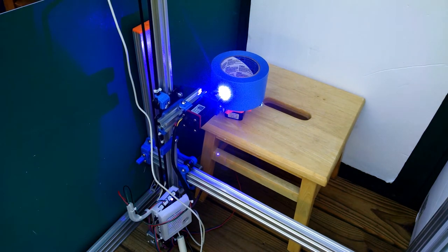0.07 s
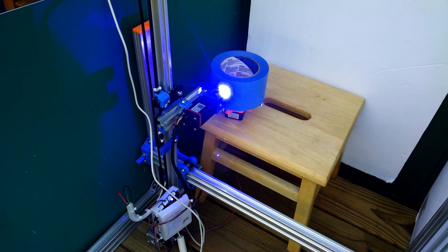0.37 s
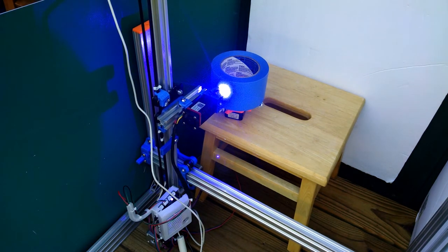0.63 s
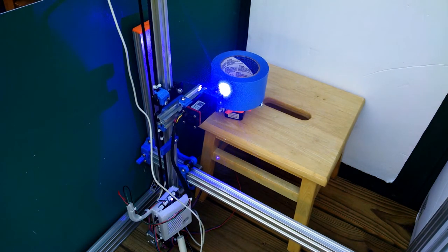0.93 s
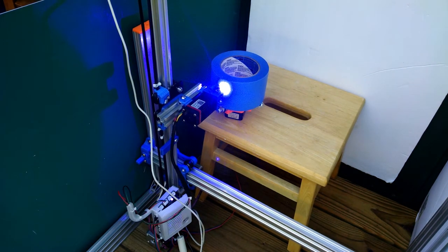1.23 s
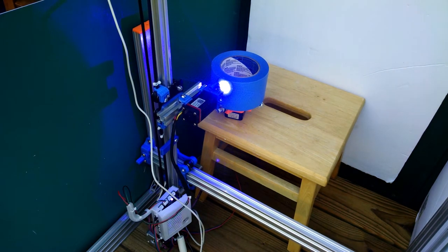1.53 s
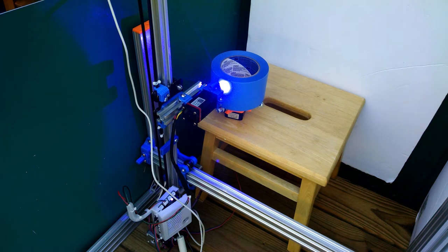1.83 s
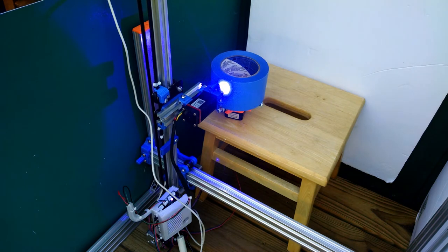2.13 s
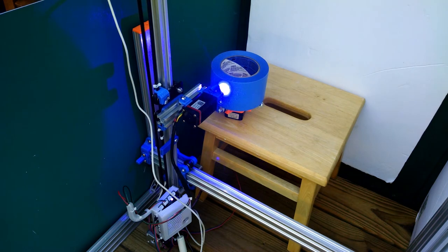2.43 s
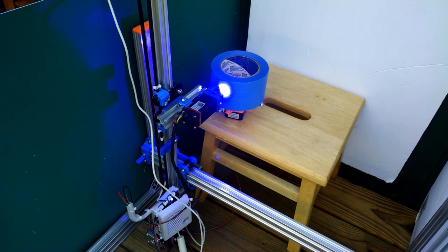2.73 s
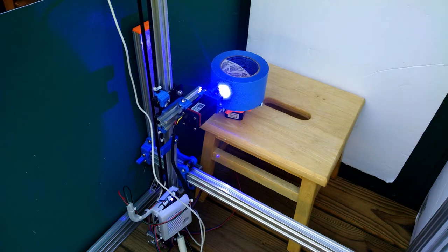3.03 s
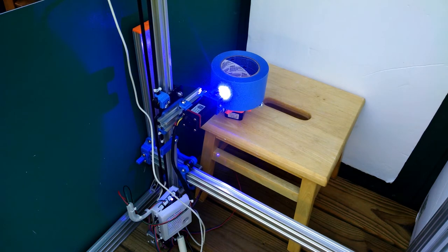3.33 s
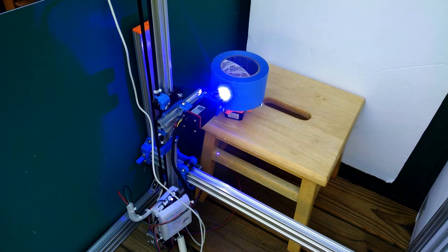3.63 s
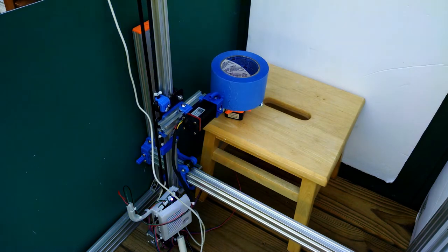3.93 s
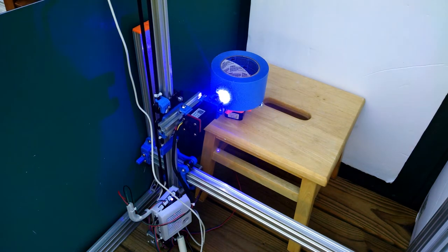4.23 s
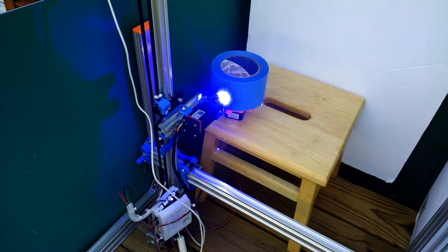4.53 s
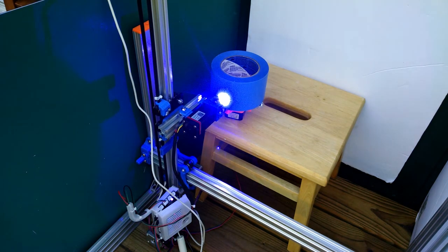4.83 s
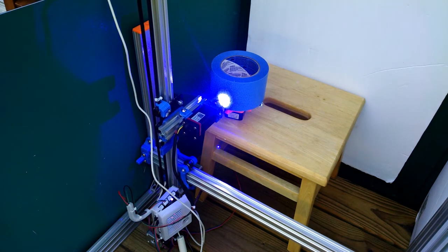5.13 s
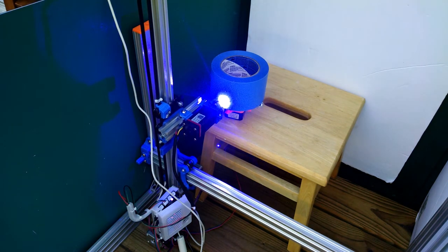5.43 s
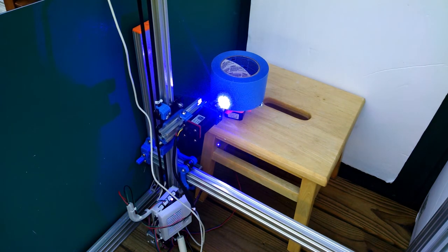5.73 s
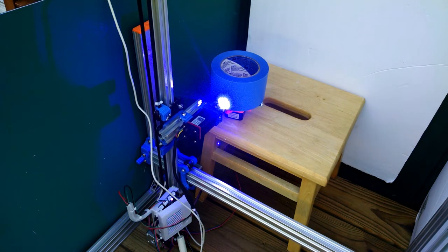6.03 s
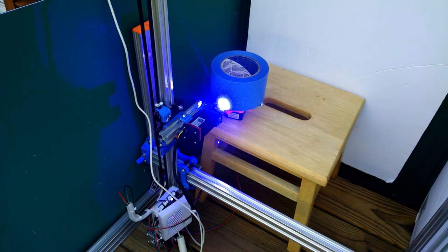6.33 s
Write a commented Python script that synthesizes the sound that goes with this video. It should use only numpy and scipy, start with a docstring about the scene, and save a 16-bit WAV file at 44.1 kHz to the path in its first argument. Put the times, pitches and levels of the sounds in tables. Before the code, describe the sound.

The steady blowing of a cooling fan and the thin, warbling whine of stepper motors come from an engraving machine, heard close up in stereo in a small workshop. Underneath are a faint hum, a low rumble and occasional dull thuds. A sharp hiss cuts in after about two and a half seconds and quickly fades. The rubbing along the rail then eases off while the fan and motors carry on.

```python
"""A cooling fan blows and drones over mains hum: a home-built laser engraver is at work in a small
workshop, close to a pair of microphones. Its stepper coils whistle in quick sweeps, the motors whirr,
the carriage sings and the gantry rumbles and jolts. One axis rubs along its rail, speeds up and slows
again. About 2.6 seconds in, one short hiss bursts out, scatters from the walls and dies away."""
import sys
import numpy as np
from scipy import signal
from scipy.fft import rfft, irfft
from scipy.io import wavfile

SR = 44100
rng = np.random.default_rng(int(sys.argv[2]) if len(sys.argv) > 2 else 0)


def transcribe(u):
    """Save the signal u as a 16-bit wav file named by the first command-line argument.

    u: samples, shape (n,) or (channels, n), limited to [-1, 1]; the rate is SR.
    q: integer samples, one column per channel.
    """
    v = np.clip(np.atleast_2d(u).T, -1, 1)
    q = np.round(v * 32767).astype(np.int16)
    wavfile.write(sys.argv[1], SR, q)


N = 286209
T = np.arange(N) / SR
HZ = np.fft.rfftfreq(N, 1 / SR)
THROB_HZ, PULLEY_HZ, SWAY_HZ, CHIRP_HZ = 43.92, 13.29, 4.855, 4.778  # sweep rates of the coil whistles

# How alike the two microphones hear noise. Each row: frequency in Hz, likeness from 0 to 1.
MIC_LIKENESS = [(25, .94), (70, .85), (160, .6), (400, .52), (800, .72), (1200, .92), (2500, .96),
                (3700, .84), (5000, .84), (6500, .68), (7700, .75), (10000, .87), (15000, .8)]
# Standing waves of the workshop. Each row: frequency in Hz, lead of the left microphone in radians.
ROOM_LEAD = [(20, 0.28), (60, 0.74), (135, 1), (190, 0.68), (270, 0), (360, 0.68), (500, 0.91), (1200, 0)]
# The fan's shaft. Each row: time in seconds, turns per second.
ROTOR_SPEED = [(0, 79), (1.4, 80), (2, 81.7), (3.3, 83.8), (4.1, 84.4), (5.2, 84.15), (6.49, 83.1)]
# The fan's drone. Each row: time in seconds, level in dB, left minus right in dB.
ROTOR_DRONE = [(0, -42, -9), (.2, -38.5, -2), (.42, -50.5, -12), (.75, -34.5, -3), (1, -43.5, -1),
               (1.6, -48, -8), (1.9, -35, -5.5), (2.3, -39, -7), (2.8, -36.5, -6), (3.3, -37.5, 1),
               (3.9, -33, -2), (4.3, -36.5, 0), (4.5, -42.5, 3), (4.75, -39.5, -1.5), (5.05, -44.5, -5),
               (6, -47, -11), (6.49, -56, -5)]

# Noise spectra. Each row: frequency in Hz, relative spectral level in dB.
AIR_SPECTRUM = [(130, 3.5), (250, -2.5), (330, 0), (400, -2.5), (600, -1.5), (980, -3.5), (1420, -8),
                (2150, -5.5), (2700, -12), (3800, -5), (6000, -18), (7900, -6.5), (8900, -22), (14500, -18)]  # rush of the fan
RUMBLE_SPECTRUM = [(10, -20), (20, 1), (38, 11), (57, 6.5), (75, 10), (115, -5.5), (170, -13.5), (280, -46),
                   (600, -30)]  # frame and floor
THUD_SPECTRUM = [(12, -14), (24, -2), (40, 15), (56, 5), (78, 8), (115, -13), (280, -33)]  # a jolt through the floor
SHUDDER_SPECTRUM = [(60, -25), (115, 6.5), (160, 1), (220, 5), (300, -0.5), (420, -14), (900, -2),
                    (1600, -29)]  # gantry frame
RUB_SPECTRUM = [(1500, -13), (2600, -7.5), (3300, -4), (4300, -6), (5300, -3), (6200, 0.5), (7900, -10),
                (8900, -16), (11500, -17.5), (14500, -23)]  # wheels and belt along the rail
HISS_SPECTRUM = [(1400, -7), (2000, -14), (2800, 4), (3800, 7), (5200, 4.5), (6300, 4.5), (7200, 8),
                 (9000, 4.5), (12000, 4), (13300, 3.5), (14500, -1), (15300, 5)]  # the short burst

# Resonances. Each row: centre in Hz, width in Hz, relative level in dB.
FAN_HOUSING_RESONANCES = [(325, 23, 0), (440, 36, 1), (496, 22, -4.5), (755, 29, -2), (1012, 50, -4.5),
                          (1180, 28, -4.5)]
STEPPER_CASING_RESONANCES = [(6680, 290, -11), (7220, 180, 0.5), (7570, 120, -2), (11340, 140, -17.5),
                             (13300, 420, -17.5)]
CARRIAGE_RESONANCES = [(5230, 36, 2), (5520, 48, -3), (6540, 80, 7), (6760, 120, -0.5), (6760, 140, 5),
                       (7300, 320, 10)]
RAIL_RESONANCES = [(2486, 20, -10.5), (3770, 37, 3), (3980, 30, -0.5), (4950, 98, -0.5)]

# Jolts of the gantry. Each row: middle and length in seconds, thud and shudder levels in dB.
GANTRY_JOLTS = [(0.267, .3, -50, -55), (.66, 0.26, -40, -56), (0.933, 0.18, -58, -40),
                (2.64, 0.18, -36.5, -38.5), (2.885, 0.29, -36.5, -60), (3.6, 1.8, -43, -54),
                (5.416, 0.16, -39.5, -64), (5.803, 0.27, -36, -44), (6.124, 0.3, -40, -62)]
# Mains hum. Each row: frequency in Hz, relative level in dB, left minus right in dB, left lead in radians.
MAINS_PARTIALS = [(99.8, 0, -4.5, 2), (149.8, -13, 3, 1)]
# Swells of the hum. Each row: middle and length in seconds, level of the added hum in dB.
MAINS_SWELLS = [(.1, 0.83, -47), (1.5, 0.97, -40), (6, 0.68, -46.5)]
# Thin tones of the motors. Each row: frequency in Hz, level in dB, left minus right in dB.
MOTOR_TONES = [(238.1, -57.5, 11.5), (1185, -64, 1), (12768, -70, 14)]
# Coil whistles. Each row: top pitch, dip and jitter in Hz, sweeps per second, first crest in seconds,
# crest sharpness, starting level in dB, growth in dB per second, fade in the dip in dB,
# relative level of the octave in dB, left minus right in dB.
COIL_WHISTLES = [(7530, 90, 16, THROB_HZ, 0.0024, 1, -47.5, 0.41, 10, -14, 7.5),
                 (7260, 170, 59.3, THROB_HZ, .001, 1, -51, 0, 5, -25, -6.5),
                 (6875, 260, 37.2, PULLEY_HZ, 0.0151, 1.5, -48.5, 0.16, 4, -16, 1),
                 (6740, 110, 85, SWAY_HZ, .097, 4, -50, 0, 13.5, -25, -3),
                 (6310, 70, 50.4, CHIRP_HZ, 0.056, 10, -54, -0.27, 11.5, -24, 6)]
# Scrapes in each turn of the belt pulley. Each row: centre and width in Hz, level at top speed in dB,
# place in the turn from 0 to 1.
PULLEY_SCRAPES = [(3100, 760, -48, 0.52), (5240, 480, -46, 0.16), (7860, 200, -49, 0.96)]
# Travel of the moving axis. Each row: time in seconds, share of top speed from 0 to 1.
AXIS_TRAVEL = [(0, 0.47), (1.3, 0.84), (2.3, 0.93), (4.8, 0.42), (5.8, 0.22), (6.49, 0.25)]
# Rough whirrs of the motors. Each row: start and end in seconds, first pitch, last pitch and smear in Hz,
# level in dB, left minus right in dB.
MOTOR_WHIRRS = [(-.15, 0.448, 157, 159.5, 2.8, -42, 5), (0.403, 1.15, 159.8, 163.9, 3.6, -50.5, 10),
                (0.037, .3, 301, 280, 17, -45, -2), (0.8, 1.995, 423, 434.4, 14, -48.5, 15),
                (1.851, 2.689, 450.6, 498.4, 28.3, -46.5, 10), (2.1, 3.106, 522, 547, 14.3, -48.5, 9),
                (2.298, 3.6, 335, 317.5, 24, -51.5, 3), (2.448, 2.753, 433, 432, 13.2, -44, 9),
                (3.154, 3.953, 444, 448, 18.5, -48, -8), (3.187, 4.398, 192.6, 185.8, 10.8, -49.5, 6),
                (5.65, 5.913, 371.6, 216.7, 25, -46, 3)]


def amp(db):
    """Decibels to gain."""
    return 10 ** (np.asarray(db) / 20)


def unit_rms(x):
    """Scales to rms 1."""
    return x / np.sqrt(np.mean(abs(x) ** 2) + 1e-20)


def over_time(rows, column=1):
    """One column of a time table at every sample."""
    rows = np.asarray(rows, float)
    return np.interp(T, rows[:, 0], rows[:, column])


def over_frequency(rows):
    """A frequency table at every bin, joined on a log axis."""
    hz, value = np.transpose(rows)
    return np.interp(np.log(HZ + 1), np.log(hz + 1), value)


def drift(rate_hz):
    """Random wander of rms 1, mostly slower than rate_hz."""
    lowpass = np.exp(-(HZ / rate_hz) ** 2) * (HZ > 0)
    return unit_rms(irfft(rfft(rng.standard_normal(N)) * lowpass, N))


def progress(start, length):
    """Runs from 0 to 1 during an event."""
    return np.clip((T - start) / length, 0, 1)


def arch(start, length):
    """A gain that swells and fades once."""
    return np.sin(np.pi * progress(start, length))


def running_phase(hz):
    """Phase of a frequency curve, from a random start."""
    return 2 * np.pi * (np.cumsum(hz * np.ones(N)) / SR + rng.random())


def panned(balance_db):
    """Microphone gains for a level difference, left minus right."""
    return amp(np.array([[.5], [-.5]]) * balance_db)


def mic_lag(hz, delay_s=1 / 2595, from_hz=1190):
    """Phase by which the left microphone trails; the bass arrives in step."""
    return 2 * np.pi * delay_s * np.maximum(hz - from_hz, 0)


def tone(phase, balance_db, lead=0.):
    """A sine at both microphones, rms 1 before panning; the left leads by `lead` radians."""
    return np.sqrt(2) * np.array([np.cos(phase + lead), np.cos(phase)]) * panned(balance_db)


def noise(colour, skew=0.):
    """Noise of rms 1 reaching the microphones from both sides; skew favours left (-1) or right (1)."""
    right, unrelated = rfft(rng.standard_normal((2, N)))
    arrival = np.cos(mic_lag(HZ)) - 1j * skew * np.sin(mic_lag(HZ))
    shared = over_frequency(MIC_LIKENESS) * arrival * np.exp(1j * over_frequency(ROOM_LEAD))
    left = shared * right + np.sqrt(1 - abs(shared) ** 2) * unrelated
    return unit_rms(irfft(colour * np.array([left, right]), N))


def resonances(modes):
    """Gain over frequency of a few steep resonances."""
    return np.sqrt(sum((amp(db) / (1 + ((HZ - hz) / width) ** 2)) ** 2 for hz, width, db in modes))


def split(x, corner_hz):
    """The parts of a sound below and above a soft corner."""
    low = irfft(rfft(x) / (1 + (HZ / corner_hz) ** 4), N)
    return low, x - low


def cooling_fan(body_db=-32.5, fade_db_per_s=0.5, fizz_db=-41.5, waver_db=0.6):
    """Air rushes through the housing and slowly eases; the unbalanced rotor drones."""
    bass_cut = HZ / np.hypot(HZ, 110)
    colour = np.hypot(amp(over_frequency(AIR_SPECTRUM)), resonances(FAN_HOUSING_RESONANCES))
    body, fizz = split(noise(colour * bass_cut, skew=-0.11), corner_hz=1485)
    rush = body * amp(body_db - fade_db_per_s * T) + fizz * amp(fizz_db)
    shaft_hz = over_time(ROTOR_SPEED) + 0.26 * drift(2.9)
    drone = tone(running_phase(shaft_hz), over_time(ROTOR_DRONE, column=2), lead=1.0)
    return rush * panned(0.082) + drone * amp(over_time(ROTOR_DRONE) + waver_db * drift(11))


def gantry(rumble_db=-42.5, shudder_db=-38, settle_db_per_s=3.7):
    """The frame rumbles while its first shudder settles; each jolt gives a thud and a fresh shudder."""
    thud_gain, shudder_gain = np.zeros(N), amp(shudder_db - settle_db_per_s * T)
    for middle, length, thud_db, shake_db in GANTRY_JOLTS:
        swell = arch(middle - length / 2, length)
        thud_gain = np.hypot(thud_gain, swell * amp(thud_db))
        shudder_gain = np.hypot(shudder_gain, swell * amp(shake_db))
    rumble = noise(amp(over_frequency(RUMBLE_SPECTRUM))) * amp(rumble_db)
    thuds = noise(amp(over_frequency(THUD_SPECTRUM))) * thud_gain
    shudder = noise(amp(over_frequency(SHUDDER_SPECTRUM))) * shudder_gain
    return (rumble + thuds) * panned(-0.95) + shudder * panned(2.5)


def mains_hum(level_db=-50, waver_db=2.2):
    """The mains hum holds its pitch and swells now and then."""
    bed = amp(level_db + waver_db * drift(1.9))
    swells = sum(amp(db) * arch(middle - length / 2, length) for middle, length, db in MAINS_SWELLS)
    hum = sum(tone(running_phase(hz), balance_db, lead) * amp(db)
              for hz, db, balance_db, lead in MAINS_PARTIALS)
    return hum * (bed + swells)


def motor_tones(waver_db=1.5, wander_hz=3.46):
    """The motors give thin tones that waver in pitch and level."""
    out = np.zeros((2, N))
    for hz, db, balance_db in MOTOR_TONES:
        phase = running_phase(hz + wander_hz * drift(11.9))
        out += tone(phase, balance_db, -mic_lag(hz)) * amp(db + waver_db * drift(2.2))
    return out


def stepper_coils(fizz_db=-44.5, shimmer_db=3.0, wander_cycles=0.013):
    """Chopped current fizzes in the casings; each coil's whistle climbs, swells and dips with each step."""
    out = noise(resonances(STEPPER_CASING_RESONANCES), skew=0.26) * amp(fizz_db) * panned(1.1)
    for (top_hz, dip_hz, jitter_hz, sweeps_per_s, first_s, sharpness,
         db, growth_db_per_s, fade_db, octave_db, balance_db) in COIL_WHISTLES:
        cycles = sweeps_per_s * (T - first_s) + wander_cycles * drift(1)
        crest = .5 + .5 * np.cos(2 * np.pi * cycles)
        dip = 1 - crest ** sharpness
        phase = running_phase(top_hz - dip_hz * dip + jitter_hz * drift(154))
        whistle = tone(phase, balance_db, -mic_lag(top_hz))
        octave = tone(2 * phase, 0, -mic_lag(2 * top_hz)) * amp(octave_db)
        pulsing = unit_rms(amp(shimmer_db * drift(80) - fade_db * dip))
        out += (whistle + octave) * amp(db + growth_db_per_s * T) * pulsing
    return out


def carriage(level_db=-47, surge_db=1.5):
    """The rolling carriage sings unevenly in its resonances."""
    singing = noise(resonances(CARRIAGE_RESONANCES), skew=0.12)
    return singing * amp(level_db + surge_db * drift(12)) * panned(0.72)


def moving_axis(top_speed_rub_db=-36.5, wander_turns=0.34, whine_db=-50, whine_waver_db=2.0):
    """The rub on the rail grows with speed and flutters as the pulley scrapes; the motor casing whines."""
    colour = np.hypot(amp(over_frequency(RUB_SPECTRUM)), resonances(RAIL_RESONANCES))
    rub = noise(colour, skew=-0.34) * amp(top_speed_rub_db + .5 * drift(39))
    turns = PULLEY_HZ * T + wander_turns * drift(0.48)
    for hz, width, db, place in PULLEY_SCRAPES:
        stroke = abs(np.cos(np.pi * (turns - place))) ** 3
        rub += noise(resonances([(hz, width, 0)]), skew=-0.13) * amp(db) * unit_rms(stroke)
    whine = noise(resonances([(2134, 82, 0)]), skew=-0.2) * amp(whine_db + whine_waver_db * drift(2.7))
    return rub * over_time(AXIS_TRAVEL) * panned(0.56) + whine * panned(3.4)


def motor_whirrs(flutter_db=2.0, jitter_rate_hz=45, fullness=0.41):
    """Each whirr swells and fades on a gliding pitch that trembles enough to smear into the rush of air."""
    out = np.zeros((2, N))
    for start, end, first_hz, last_hz, smear_hz, db, balance_db in MOTOR_WHIRRS:
        glide_hz = first_hz + progress(start, end - start) * (last_hz - first_hz)
        phase = running_phase(glide_hz + smear_hz * drift(jitter_rate_hz))
        swell = abs(arch(start, end - start)) ** fullness
        out += tone(phase, balance_db) * amp(db + flutter_db * drift(32)) * swell
    return out


def hiss(start_s=2.598, attack_s=0.032, fade_after_s=0.086, fade_s=0.45,
         level_db=-20, flicker_db=1.23, puff_db=-42):
    """A hiss, partly scattered from the walls, over a soft lingering puff; its top dies before its body."""
    attack = progress(start_s, attack_s)
    fading = 1 - progress(start_s + fade_after_s, fade_s)
    release = fading ** 1.98
    colour = amp(over_frequency(HISS_SPECTRUM))
    scatter = HZ / np.hypot(HZ, 3000)  # short waves scatter most
    from_walls = unit_rms(irfft(rfft(rng.standard_normal((2, N))) * colour * scatter, N))
    direct = noise(colour, skew=.5)
    body, top = split(unit_rms(direct + .7 * from_walls), corner_hz=10900)
    puff = noise(resonances([(990, 2700, 0)])) * amp(puff_db) * fading
    burst = (body + top * release) * release * amp(level_db + flicker_db * drift(50))
    return attack * (puff + burst) * panned(0.46)


def scene():
    """The whole engraver, close up, at the left and right microphones."""
    return (cooling_fan() + gantry() + mains_hum() + motor_tones() + stepper_coils()
            + carriage() + moving_axis() + motor_whirrs() + hiss())


def record(dry):
    """The recorder takes both microphones up to its band limit of 15220 Hz."""
    lowpass = signal.firwin(511, 15220, window=("kaiser", 9), fs=SR)
    return signal.oaconvolve(dry, lowpass[None], "same")


dry = scene()
out = record(dry)
transcribe(out)
```